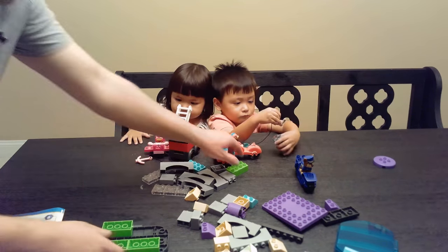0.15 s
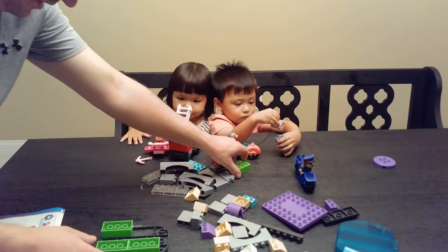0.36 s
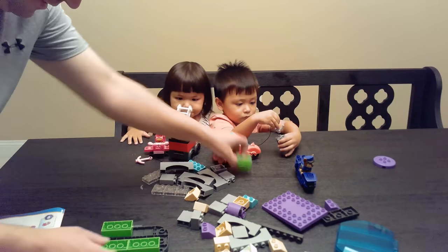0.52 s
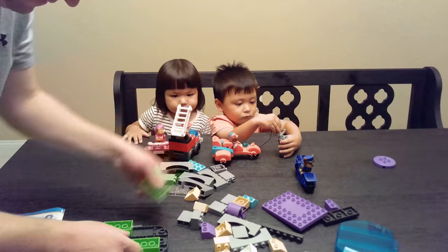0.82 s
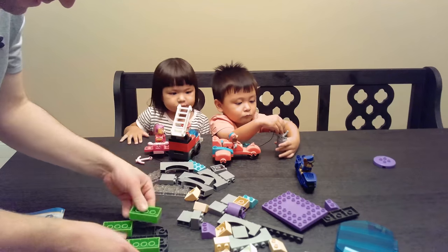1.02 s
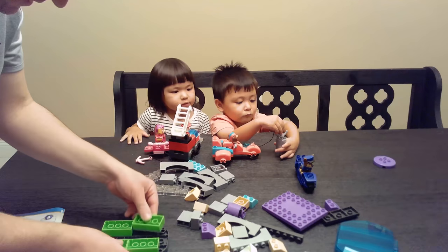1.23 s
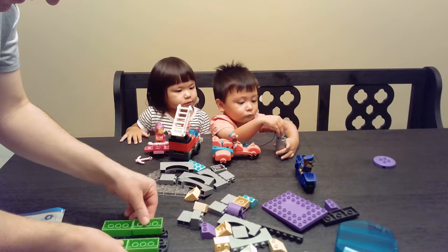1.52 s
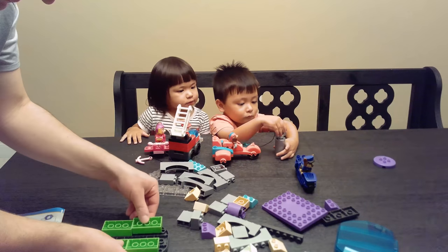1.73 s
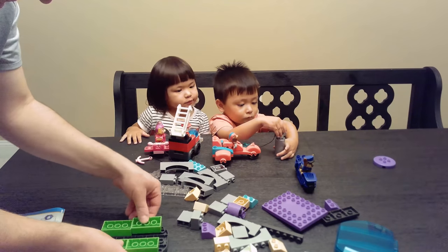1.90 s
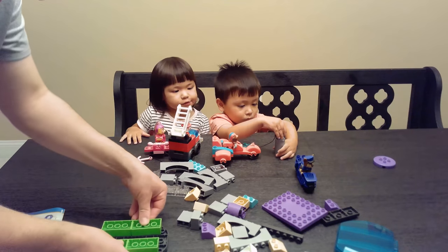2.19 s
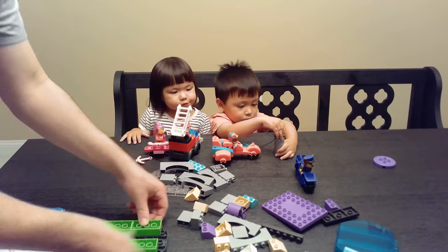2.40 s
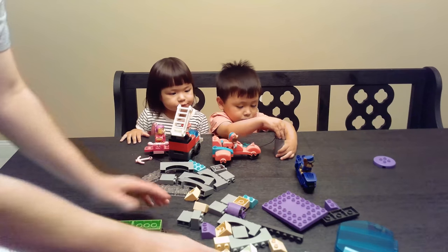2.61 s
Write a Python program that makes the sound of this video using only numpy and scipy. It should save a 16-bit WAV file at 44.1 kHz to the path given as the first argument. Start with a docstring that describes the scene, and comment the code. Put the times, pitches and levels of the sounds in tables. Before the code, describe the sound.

A plastic building brick is slid, placed and pressed onto others with two snaps.

```python
"""A hand slides a hollow plastic toy brick off a hard table; it knocks and scrapes, and loose pieces tick.
After about a second it lands on other bricks, chatters over their studs and is rubbed into place.
The first studs catch with a snap, then a louder snap seats the brick and thumps the table.
A few faint knocks and a last scrape follow. All along, the small room echoes each sound
and a sleeve rustles over the quiet room noise."""
import sys
import numpy as np
from scipy import signal
from scipy.fft import rfft, irfft
from scipy.io import wavfile

SR = 44100
rng = np.random.default_rng(int(sys.argv[2]) if len(sys.argv) > 2 else 0)


def to_wav(s):
    """Save 16-bit WAV."""
    ch = np.atleast_2d(s).T  # columns
    pcm = np.round(np.clip(ch, -1, 1) * 32767)  # PCM
    wavfile.write(sys.argv[1], SR, pcm.astype(np.int16))


N = 121275
T = np.arange(N) / SR

# Table levels are relative. A "t60" is the time in seconds that a sound takes to fade by 60 dB.
# The clicks of the final snap: t/s, level/dB, f/Hz above which the treble is softened
SNAPS = [(2.1256, -13, 11700), (2.128, -6.5, 9000), (2.1302, -15, 9100), (2.1432, -14, 11000)]
# The seated brick's ringing tones, then the tone colour of its clatter: f/Hz, level/dB
SEATED_TONES = [(2380, -26), (2480, -3.5), (3020, -13), (3800, -11), (4791, -9.5), (5647, -12)]
SEATED_CLATTER = [(100, -1), (700, -8.5), (2700, 2.5), (4200, -2), (8000, -7.5), (10000, -17), (15000, -38)]
def snaps():
    """The brick snaps home and hits bottom: the loudest, brightest clicks."""
    return strike(SNAPS, SEATED_TONES, SEATED_CLATTER, ring_t60=0.016, clatter_db=-6)


# The clicks of the first snap: t/s, level/dB, treble limit f/Hz
CATCHES = [(1.755, -27, 6000), (1.7642, -12.5, 8600), (1.769, -22.5, 9000)]
# The half-seated brick's tones, then the colour of its clatter: f/Hz, level/dB
CAUGHT_TONES = [(1324, -50), (1674, -2.5), (1880, -14), (2724, -10), (4716, -9), (7700, -11.5)]
CAUGHT_CLATTER = [(100, -1.5), (700, 5), (2300, 0.5), (4500, 1.5), (8000, -7.5), (11000, -67)]
def catches():
    """The first studs catch and jolt the brick into ringing."""
    return strike(CATCHES, CAUGHT_TONES, CAUGHT_CLATTER, ring_t60=0.018, clatter_db=-8.5)


# Knocks of the held brick: t/s, level/dB, treble limit f/Hz
KNOCKS = [(.1635, -26, 780), (.8025, -30.5, 870), (1.4775, -20, 5000), (1.4792, -23.5, 6700),
          (1.4945, -23.5, 6950), (1.517, -29.5, 4960), (2.1445, -15, 1580), (2.174, -19.5, 2500),
          (2.2705, -31.5, 2980), (2.551, -31, 2230)]
# Its tones, then the clatter colour it shares with landings and ticks: f/Hz, level/dB
HELD_TONES = [(1185, -7), (1590, -5.5), (1760, -8), (2400, -6.5), (3700, -28), (6800, -17), (7850, -19.5)]
BRICK_CLATTER = [(100, -35), (420, -1.5), (800, -7.5), (1200, 1.5), (2200, -4.5), (3200, -6.5), (5000, -11),
                 (8000, -14), (14000, -73)]
def knocks():
    """The hollow brick rings as it bumps the table and the other bricks."""
    return strike(KNOCKS, HELD_TONES, BRICK_CLATTER, ring_t60=0.028, clatter_db=-3.5)


# Quick, dull bumps on the studs: t/s, level/dB, treble limit f/Hz
LANDINGS = [(1.0655, -36, 900), (1.0705, -27, 1500), (1.0802, -25, 1100), (1.0862, -26, 900)]
# The landing brick's tones: f/Hz, level/dB
LANDING_TONES = [(600, -21), (1200, -2.5), (1690, -3), (6780, -7), (7750, -3)]
def landings():
    """The brick lands on the others and chatters over their studs."""
    return strike(LANDINGS, LANDING_TONES, BRICK_CLATTER, ring_t60=0.028, clatter_db=-3.5)


# Blows that reach the table: t/s, thump level/dB, ring level/dB
THUDS = [(.164, -68, -36), (1.069, -77, -37), (1.48, -55, -37), (1.765, -44, -43), (2.127, -40.5, -43),
         (2.144, -24, -29.5), (2.552, -37.5, -48.5)]
# The colour of the thump, then the tabletop's tones: f/Hz, level/dB
THUMP_COLOUR = [(45, -1), (80, -7), (120, -4), (420, 2), (4000, -31)]
TABLE_TONES = [(390, 4.5), (475, 1.5), (590, -2), (770, -3), (880, -11), (1090, -5)]
def thuds():
    """Struck through the bricks, the tabletop gives a dull thump and a short wooden ring."""
    out, ring = np.zeros(N), ringing(TABLE_TONES, t60=0.043)
    for start, thump_db, ring_db in THUDS:
        thump = burst(THUMP_COLOUR, t60=0.027)
        add(out, start, from_db(thump_db) * thump + from_db(ring_db) * ring)
    return out


# Light taps of loose pieces: t/s, level/dB, treble limit f/Hz
TICKS = [(.055, -44.5, 12000), (.379, -38, 7000), (.4045, -33.5, 7000), (.4345, -29, 3470),
         (.4465, -30, 2460), (.5735, -38.5, 4000), (2.2995, -38.5, 3000)]
# The tones of a loose or sliding brick: f/Hz, level/dB
LOOSE_TONES = [(1230, -3.5), (1500, 3), (1920, -2.5), (3750, 0.5), (4800, -4.5), (6250, -8.5), (7250, -11)]
LOOSE_T60_S = 0.009
def ticks():
    """Loose pieces tap and ring very briefly."""
    return strike(TICKS, LOOSE_TONES, BRICK_CLATTER, ring_t60=LOOSE_T60_S, clatter_db=-1)


# Sliding strokes: start t/s, rise t/s, fall t/s, level/dB, treble limit f/Hz,
# squeak f/Hz, squeak level/dB relative to the stroke
SCRAPES = [(0.35, 0.013, 0.029, -37, 11000, 1233, -2), (0.421, 0.018, 0.015, -49.5, 2970, 1420, 13),
           (0.541, 0.017, 0.023, -45, 12000, 4900, -13), (.8, 0.054, 0.032, -58, 12100, 4540, -2.5),
           (1.054, 0.014, 0.04, -46.5, 4000, 1180, 10), (1.185, 0.0094, .06, -58, 12000, 4720, -4),
           (1.57, 0.077, 0.01, -48.5, 9200, 745, 0.5), (1.629, 0.012, 0.015, -54.5, 1800, 1640, 14),
           (2.478, 0.028, 0.024, -50.5, 9000, 882, 7.5)]
SLIPS_PER_S, SLIP_SPREAD_DB, SQUEAK_WIDTH_HZ = 1800, 1, 140
def scrapes():
    """Many tiny slips keep the sliding brick ringing; each stroke squeaks at its own pitch."""
    slips = (rng.random(N) < SLIPS_PER_S / SR) * rng.choice([-1, 1], N)
    slips = slips * from_db(SLIP_SPREAD_DB * np.minimum(rng.exponential(1, N), 3))
    rub = rms_one(signal.fftconvolve(slips, ringing(LOOSE_TONES, LOOSE_T60_S))[:N])
    out = np.zeros(N)
    for start, rise, fall, db, treble_hz, squeak_hz, squeak_db in SCRAPES:
        resonance = signal.iirpeak(squeak_hz, squeak_hz / SQUEAK_WIDTH_HZ, fs=SR)
        squeak = rms_one(signal.lfilter(*resonance, slips))
        stroke = np.interp(T, [start, start + rise, start + rise + fall], [0, 1, 0])
        out += from_db(db) * stroke * (soften(rub, treble_hz) + from_db(squeak_db) * squeak)
    return out


# How long the echo lasts at each pitch: f/Hz, t60/s
ECHO_T60 = [(100, 0.63), (300, 0.6), (800, 0.49), (2000, 0.5032), (8000, 0.5)]
# The strength of the echo's bands: f/Hz, level/dB
ECHO_COLOUR = [(100, 7), (1000, 2), (12000, -4)]
TAIL_DB, EARLY_DB, EARLY_T60_S, WALL_DELAY_S = -6.5, -4, 0.13, 0.0047
def room_echo(x, size=32768):
    """Sound bounces off the table and walls, then blurs into a tail that dies band by band."""
    white, tail = rng.standard_normal((2, size)), 0
    edges_hz = np.geomspace(50, 16000, 13)
    for k, (low, high) in enumerate(zip(edges_hz, edges_hz[1:])):
        band = signal.sosfilt(signal.butter(2, [low, high], "band", fs=SR, output="sos"), white[k % 2])
        hz = np.sqrt(low * high)
        tail = tail + band * from_db(at_hz(ECHO_COLOUR, hz)) * fade(at_hz(ECHO_T60, hz), size)
    early = rng.standard_normal(size) * (rng.random(size) < .03) * fade(EARLY_T60_S, size)
    arrival = np.clip(T[:size] / WALL_DELAY_S - .5, 0, 1)
    response = from_db(TAIL_DB) * rms_one(tail * arrival) + from_db(EARLY_DB) * rms_one(early * arrival)
    return signal.fftconvolve(x, response / np.sqrt(size))[:N]


# How the rustle swells and sinks: t/s, level/dB
RUSTLE_LEVELS = [(0, -58), (.28, -58), (.55, -57), (.98, -61.5), (1.22, -56), (1.95, -58), (2.1, -59),
                 (2.5, -56), (2.75, -67.5)]
# Its colour: f/Hz, level/dB
RUSTLE_COLOUR = [(100, 7.5), (400, 5.5), (1300, -3), (2500, -3), (4500, -7), (8000, -11.5), (15000, -24)]
def sleeve_rustle():
    """Sleeve and hand make a soft rushing noise as the arm moves."""
    level_db = np.interp(T, *np.transpose(RUSTLE_LEVELS))
    return from_db(level_db) * noise(RUSTLE_COLOUR)


# The colour of the quiet room: f/Hz, level/dB
ROOM_NOISE_COLOUR = [(15, -36), (25, 2), (79, -16.5), (200, 1.5), (500, -13.5), (919, -2.5), (2170, -21),
                     (3830, -18), (6000, -20.5), (15000, -22)]
def room_noise():
    """A faint, steady rumble and hiss."""
    return from_db(-61.5) * noise(ROOM_NOISE_COLOUR)


CLATTER_T60_S, RING_SHARE_IN_ROOM = 0.019, 1 / 2
def strike(hits, tones, clatter_colour, ring_t60, clatter_db):
    """Each hit makes a brick ring and clatter; returns the direct sound and the sound sent to the room."""
    direct, to_room, ring = np.zeros(N), np.zeros(N), ringing(tones, ring_t60)
    for start, db, treble_hz in hits:
        # The ring is beamed at the listener, so the room gets only part of it.
        for out, share in ((direct, 1), (to_room, RING_SHARE_IN_ROOM)):
            clatter = from_db(clatter_db) * burst(clatter_colour, CLATTER_T60_S)
            add(out, start, from_db(db) * soften(share * ring + clatter, treble_hz))
    return np.array([direct, to_room])


def ringing(tones, t60, size=8192):
    """A struck body rings with a few fading tones and gives off little below the lowest."""
    waves = sum((-1) ** k * from_db(db) * np.sin(2 * np.pi * hz * T[:size])
                for k, (hz, db) in enumerate(tones))
    bass_cut = signal.butter(2, tones[0][0] / 2, "high", fs=SR, output="sos")
    return signal.sosfilt(bass_cut, waves * fade(t60, size))


def burst(colour, t60, size=8192):
    """Many close tones die away together, like a puff of noise."""
    return np.tile(noise(colour, size // 4), 4) * fade(t60, size)


def noise(colour, size=N):
    """Steady noise with the given tone colour and an average strength (rms) of 1."""
    white = irfft(np.exp(2j * np.pi * rng.random(size // 2 + 1)), size)
    gains = from_db(at_hz(colour, np.fft.rfftfreq(size, 1 / SR)))
    return rms_one(irfft(rfft(white) * gains, size))


def soften(x, hz):
    """A softer contact loses treble."""
    return signal.sosfilt(signal.butter(1, hz, fs=SR, output="sos"), x)


def fade(t60, size):
    """Die away by 60 dB every t60 seconds."""
    return np.exp(-np.log(1000) * T[:size] / t60)


def add(out, start, x):
    """Mix a sound in at a start time in seconds."""
    i = int(start * SR)
    out[i:i + len(x)] += x[:max(N - i, 0)]


def at_hz(table, hz):
    """Read between a table's rows, with octaves evenly spaced."""
    freqs, values = np.transpose(table)
    return np.interp(np.log(np.maximum(hz, 1)), np.log(freqs), values)


def from_db(db):
    """Turn decibels into a multiplier."""
    return 10 ** (np.asarray(db) / 20)


def rms_one(x):
    """Scale to an average strength (rms) of 1."""
    return x / np.sqrt(np.mean(x ** 2) + 1e-20)


DISTANCE_DB = -4.5  # loss on the way to the listener
def scene():
    """The bricks, the table and their echo over the background, in one channel."""
    hits = knocks() + ticks() + landings() + catches() + snaps()
    direct, to_room = hits + thuds() + scrapes()
    bricks = from_db(DISTANCE_DB) * (direct + room_echo(to_room))
    return (bricks + room_noise() + sleeve_rustle())[None]


CUTOFF_HZ = 15700
def record(dry):
    """A steep filter removes the very highest treble."""
    return signal.sosfilt(signal.ellip(12, .1, 70, CUTOFF_HZ, fs=SR, output="sos"), dry)


dry = scene()
out = record(dry)
to_wav(out)
```